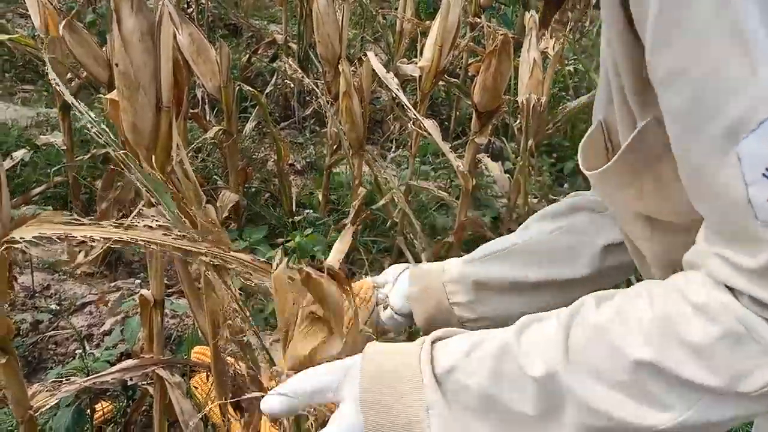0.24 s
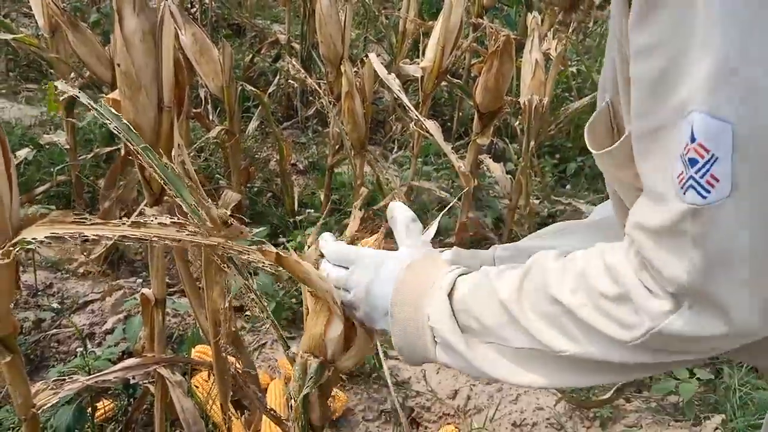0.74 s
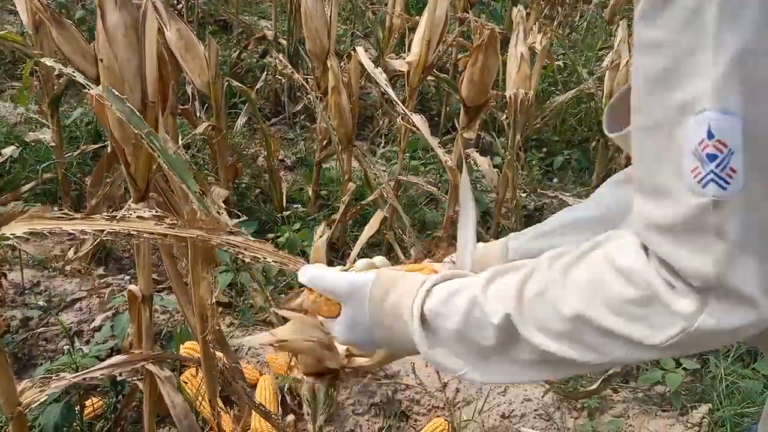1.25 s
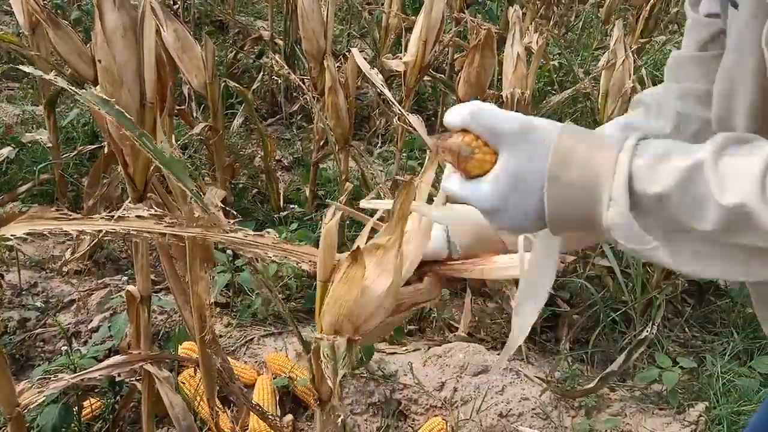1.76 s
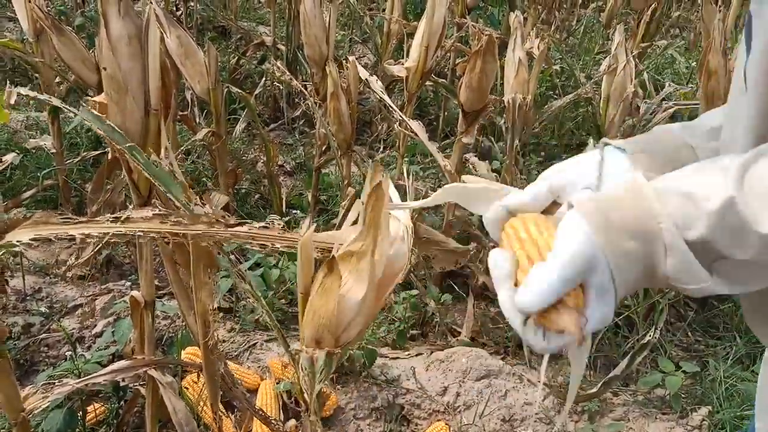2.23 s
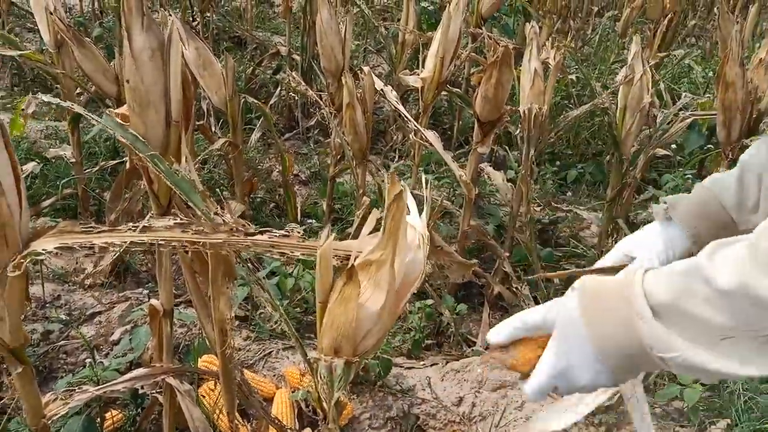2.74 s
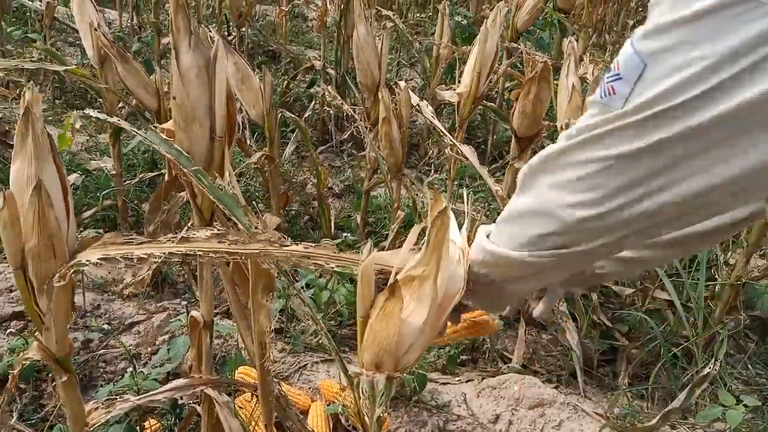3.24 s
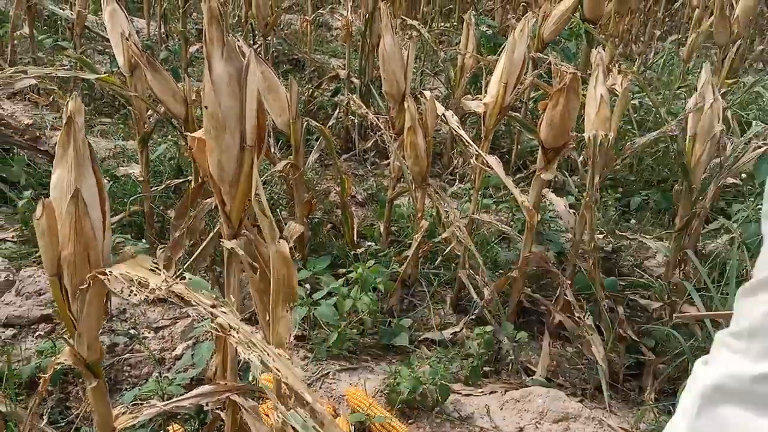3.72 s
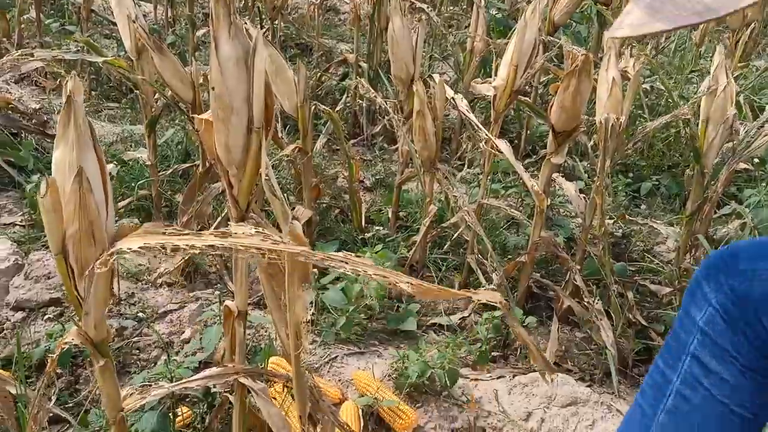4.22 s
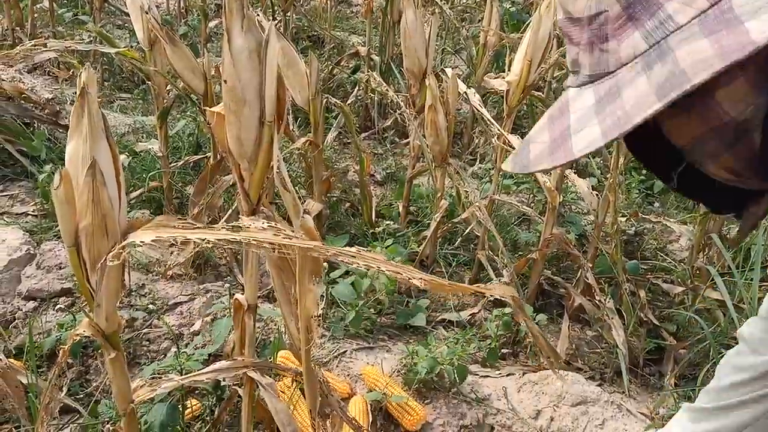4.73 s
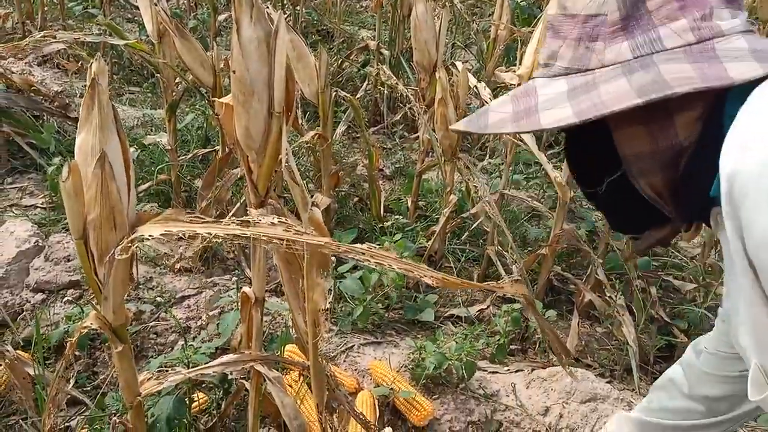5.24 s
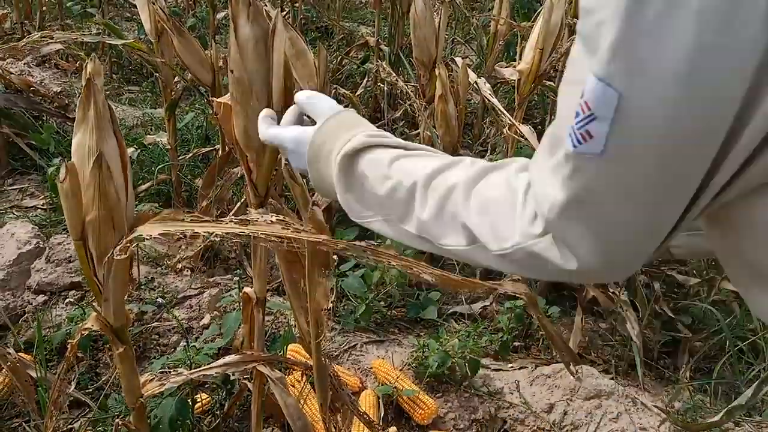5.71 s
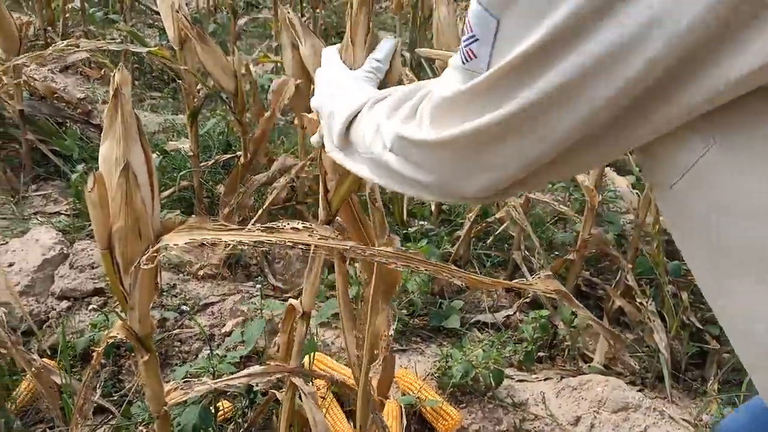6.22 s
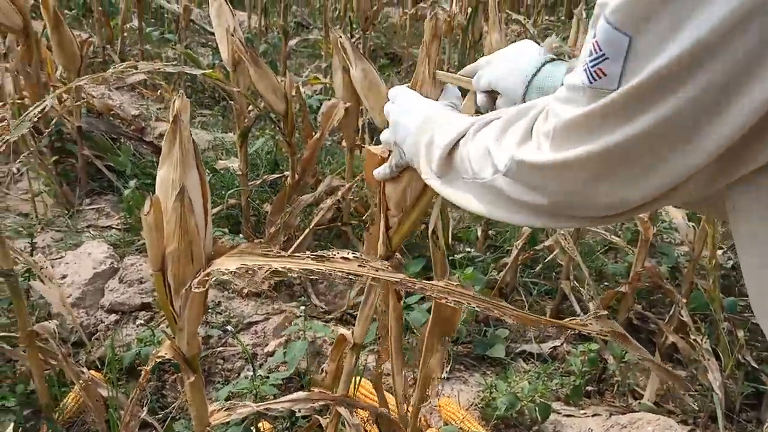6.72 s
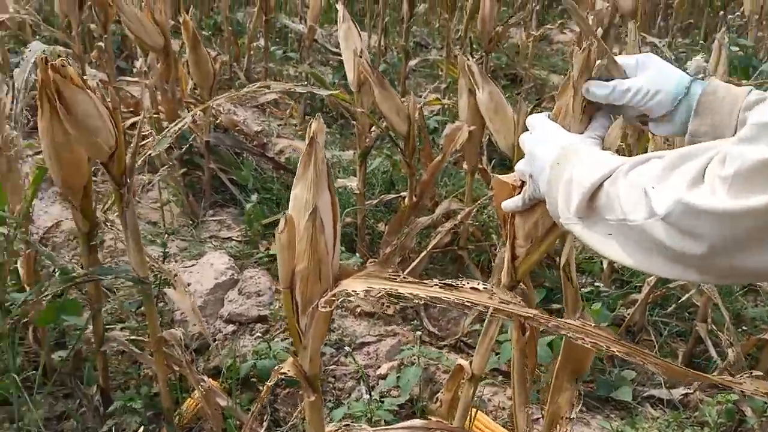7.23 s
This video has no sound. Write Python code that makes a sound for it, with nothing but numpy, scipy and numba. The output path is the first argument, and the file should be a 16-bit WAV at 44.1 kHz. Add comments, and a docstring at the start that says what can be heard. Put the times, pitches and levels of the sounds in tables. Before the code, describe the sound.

Hands grip and pull brittle corn leaves, giving crisp cracks, fibrous tearing and rustling strokes. Activity is dense at first, fades to a lull near three seconds, then comes back with a hard snap after four, looser rustles, and another crackling cluster toward the end. The place is outdoors and almost dry, recorded close in stereo, with a faint distant engine hum, quiet leaf hiss and two or three low air bumps on the right.

```python
"""Dry maize ribs snap over rubbing husks: an ear is husked by hand, an arm's length from the microphone.
Rubs and tears are swarms of tiny fibre breaks ringing leaves; ribs and folds break singly; the ear knocks dully.
Standing stalks add a short noise scatter. Puffs, bursts of slowing eddies, buffet the right port only.
Behind lie shaped field noise and a far engine, low sine harmonics that gain speed and then run on."""
import sys
import numpy as np
from scipy import signal
from scipy.fft import rfft, irfft
from scipy.io import wavfile
from scipy.ndimage import uniform_filter1d, map_coordinates
from numba import njit

SR = 44100
rng = np.random.default_rng(int(sys.argv[2]) if len(sys.argv) > 2 else 0)


def digitize_waveform(pressure):
    """Quantize a signal to 16-bit integers and store it at the path in sys.argv[1].

    Rows of a 2-D input are taken as channels; values are limited to [-1, 1].
    """
    field = np.atleast_2d(pressure).T
    bounded = np.clip(field, -1, 1)
    quanta = np.round(bounded * 32767).astype(np.int16)
    wavfile.write(sys.argv[1], SR, quanta)


N = 329148
T = np.arange(N) / SR

# background spectrum: f/Hz, relative level/dB
FIELD_SPECTRUM = [(25, -44), (65, 4.5), (110, 2.5), (220, -14.5), (350, -6), (520, -16), (770, -12.5),
                  (1200, -16), (2100, -7), (4200, -14), (6300, -13), (7600, -11), (9400, -60), (15000, -45)]
# far engine: t/s, base rate f/Hz, level before lumps and harmonic levels/dB
ENGINE_RUN = [(0, 36.6, -57), (.3, 40.1, -59.5), (.85, 41.85, -56), (1.3, 43.8, -60), (2, 44.75, -60.5),
              (2.7, 50.13, -61.5), (4.2, 49.87, -60), (5.5, 49.87, -61.5), (7, 50.8, -61.5),
              (7.46, 51.5, -63.5)]
# engine harmonics: multiple of base rate, relative level/dB
ENGINE_HARMONICS = [(2, 3), (3, -6.5), (4, -23), (5, -24), (6, -29), (7, -17)]
LABOUR_DB = 16  # lump spread, scaled by the shortfall from top speed
# air puffs on the right port: t/s, first eddy level/dB
AIR_PUFFS = [(1.159, -41.5), (4.886, -25.5), (5.161, -30)]
EDDY_HZ, EDDY_CYCLES, EDDY_GAP_S = 151, 0.55, 0.016  # rate of the first eddy, envelope width, spacing
EDDY_SLOWING, EDDY_FADE_DB = 0.77, 2.5  # rate ratio and level drop from eddy to eddy

# place of the hands: t/s, right-port lag/ms, left minus right level/dB
HAND_PATH = [(0, -0.048, -0.5), (1.2, -0.018, -1), (2.4, 0.052, -1), (3.6, 0.048, -0.6), (4.5, 0.21, 0),
             (5.6, 0.21, 0.5), (6.3, 0.28, 1), (6.8, 0.013, -2), (7.46, 0.16, -1.5)]
# dry husk spectrum: f/Hz, relative level/dB
HUSK_SPECTRUM = [(60, -40), (140, -16.5), (230, -9.5), (335, -9), (500, -12.5), (740, -1.5), (1120, 0),
                 (1450, 1.5), (2700, 3), (4300, -3), (6400, 1.5), (7700, -6.5), (9800, -18), (15500, -21)]
BODY_HZ, SIZZLE_HZ, TOP_HZ = 700, 3800, 15800  # body/crackle split, crackle/sizzle split, recorder cutoff
LEVEL_WINDOW_S = .005  # snap levels are the RMS of this first stretch

# ear knocking on stalk and glove: t/s, level/dB, ring f/Hz
EAR_KNOCKS = [(0.1044, -42, 830), (0.3227, -46, 606), (2.579, -60, 345), (4.3934, -43, 359.2),
              (5.701, -43.5, 726), (6.1463, -45.5, 300.7), (6.8028, -30, 640), (6.808, -39.5, 346)]
KNOCK_DECAY_S, KNOCK_WIDTH = 0.0049, 0.45  # 1/e decay; bandwidth / pitch
# clearest small folds giving way: t/s, crackle level/dB
CLEAR_CREASES = [(.0305, -37), (.0438, -40), (.1455, -42), (.1844, -48), (.3221, -41.5), (.4853, -41),
                 (.6312, -51), (.6877, -50), (.7352, -54), (.8115, -42.5), (.8765, -45), (.9042, -39),
                 (.9242, -46), (1.0168, -34.5), (1.0372, -31), (1.0932, -38), (1.1075, -42),
                 (1.5124, -41.5), (2.6059, -58), (2.774, -57), (2.984, -68), (3.005, -64), (3.0499, -64),
                 (3.0943, -59), (3.4325, -43.5), (3.4534, -38), (4.2227, -52), (4.3729, -40), (5.0573, -40),
                 (5.5392, -53), (5.5756, -43.5), (6.1274, -39), (6.1631, -38), (6.5165, -40),
                 (7.1785, -51.5)]
CREASE_HZ, CREASE_OCTAVES = 1950, .4  # median ring and its spread
CREASE_BODY_DB, CREASE_SIZZLE_DB, CREASE_SPLINTER_DB = -19, -7, -4  # sizzle holds at a level of -51.5 dB
CREASES_PER_S, CREASE_DB, CREASE_SPREAD_DB, CREASE_IDLE_DB = 30, -1.5, 3.2, -67  # CREASE_DB re rubbing crackle
# ribs, folds and shanks snapping: t/s, crackle level/dB, ring f/Hz, body re crackle level/dB,
# sizzle re crackle level/dB, splintering re first break level/dB
RIB_SNAPS = [(.0062, -24, 1520, -26, -35, -13), (.0158, -31, 1520, -22, -16, -12),
             (.052, -37, 1770, -21, -4, -6), (.0748, -31.5, 900, -13, -17, 8),
             (.1324, -40.5, 1100, -10, -6, 0), (.3003, -43, 1840, -19, -14, 3),
             (.416, -41, 1880, -41, 0.5, 9), (.4234, -46.5, 5820, -29, 4, 2), (.4548, -48, 2200, -27, 6, 7),
             (.4746, -39, 1610, -39.5, -22, -6), (.5839, -39, 1630, -8, 2.5, 7),
             (.6566, -29.5, 1320, -19, -10, -3), (.6588, -36, 1700, -12, -7, 4),
             (.8392, -37.5, 2130, -9, -10, 1), (1.0635, -31.5, 1290, -5, -16, 7),
             (1.0775, -27.5, 2530, -15, -5, 3), (1.1142, -38, 1997, -2, 3.5, 9),
             (1.196, -42.5, 2720, -26, 1, 2), (1.2377, -30.5, 1390, -24, -8, 15),
             (1.2483, -31.5, 1480, -25, -21, -3), (1.2651, -32, 1726, -20, -13, -12),
             (1.3228, -22, 2740, -28, -22, 6), (1.3298, -22, 2350, -13, -15, 3),
             (1.3374, -28, 2850, -4.5, -10, 4), (1.4663, -44, 2720, -26, 4, 2),
             (1.5745, -35, 2773, -29, -18, 6), (1.5892, -26.5, 2100, -18, -9, 2),
             (1.5937, -25.5, 2980, -9.5, -15, 7), (1.5996, -21.5, 2240, -11, -12, 13),
             (1.6156, -42, 2820, -28, 17.5, 14), (1.6253, -37.5, 3450, 1, 12, 1),
             (1.6808, -30.5, 2020, -24, 2.5, 5), (1.7113, -42, 2130, -24, -14, -3),
             (1.8614, -28, 1990, -19, -32, -1), (1.882, -27.5, 2000, -30, -16, -4),
             (1.896, -25, 2080, -7.5, -35, 13), (2.4107, -44.5, 2280, -39, -16, -4),
             (2.4251, -49.5, 6000, -30, 5.5, 11), (2.4402, -41.5, 3470, -36, 0, 1),
             (2.4649, -44.5, 2110, -16, 0, 13), (2.547, -52, 2000, -4, -1, 10),
             (2.8387, -55, 2220, -7, 3, 1), (2.9305, -44, 2100, -21, -16, 2),
             (3.3463, -45.5, 1978, -7, -9, -8), (3.4981, -33, 1034, -10, -13, 1),
             (3.5405, -24.5, 2450, -16, -7, 7), (3.5477, -23.5, 1310, -7.5, -22, 7),
             (3.6294, -41, 3010, -19, 9.5, 12), (3.6483, -35, 3026, -22, -4, 1),
             (3.8296, -44.5, 1300, -10, 9, 19), (3.8596, -38.5, 1170, -6, 1, 11),
             (4.2591, -36, 1240, -14, -1.5, 26), (4.2726, -40, 1810, -10, 3, 9),
             (4.3922, -18, 3154, -6, -4.5, 13.5), (4.3968, -34, 2660, 3, 2, 0),
             (4.5157, -34.5, 1160, -2, -4, 4), (4.5287, -31, 2270, -2.5, -7, 20),
             (4.5581, -26.5, 2670, -20, -14, 4), (4.5752, -30.5, 2900, -6, -3, 8),
             (4.6161, -38, 2540, -17, 13.5, -3), (4.7162, -34, 4300, -37, -5, 19),
             (4.8419, -37, 2500, -39, -15, 17), (5.6003, -42.5, 2710, -16, -10, 10),
             (5.9635, -37, 2520, -8.5, -6, 19), (6.1448, -34.5, 2170, -7, 0.5, 15),
             (6.2105, -38.5, 2510, -12, -4, 19), (6.2895, -38.5, 2410, -12, -9, 7),
             (6.4254, -19, 1790, -19, -27, -6.5), (6.4914, -33.5, 1727, -10, -15, 12),
             (6.5378, -35.5, 2530, -19, -11, 7), (6.598, -41.5, 2740, -10, -2.5, 18),
             (6.7407, -35.5, 2000, -24, 4, -1), (6.744, -28, 2230, -18, -4, -3),
             (6.7648, -28.5, 2230, -13, -5, 0), (6.776, -33, 2930, -8, -12, -2),
             (6.78, -27, 3080, -12, -7, -2), (6.8025, -24.5, 2820, -10, -5, 5),
             (6.8102, -25.5, 2360, -17, -2, 0), (6.8432, -33, 2420, -8, -4, 12),
             (6.8713, -29, 6150, -13, -6, 5), (6.8788, -30.5, 2280, -9, -11, -3),
             (6.939, -34, 2420, -6.5, -9.5, 3.5), (7.214, -46, 2400, -6, -2, 9),
             (7.333, -39.5, 1500, -20, -15, 9), (7.3953, -28, 2340, -18, -24, -20),
             (7.4358, -27.5, 1790, -11, -15.5, -2)]

# hands sliding over husks and brushing leaves: t of the top/s, crackle level/dB, rise/s, fall/s,
# body re crackle level/dB, sizzle re crackle level/dB, sheet f/Hz, hollow re crackle level/dB
HAND_STROKES = [(0.013, -35, .18, 0.062, -14, -6.5, 1520, -3), (.17, -44, 0.19, 0.28, -31, -7, 1230, -8),
                (.327, -43.5, 0.069, 0.028, -20, -.5, 1850, -2),
                (.51, -47.5, .055, 0.093, -30, -2, 1590, -4), (0.759, -46.5, .018, .05, -20, -2, 2200, -16),
                (.83, -45, 0.044, 0.084, -8, -1, 2200, -4), (0.911, -42.5, .043, 0.043, -5, -1, 2190, -23),
                (1.13, -42.5, 0.055, 0.07, -8.5, -7, 2110, -6),
                (1.371, -41.5, 0.017, 0.052, -13.5, -4, 2200, -22),
                (1.52, -48, 0.11, .08, -35, -7, 2100, -23),
                (1.651, -39.5, 0.025, 0.051, -10.5, -13, 2070, -9),
                (1.799, -43, .071, 0.077, -29, -4, 1850, -12),
                (2.001, -44, 0.15, 0.058, -20, -2.5, 2100, -3),
                (2.07, -45, 0.078, 0.059, -18, -1.5, 2400, -18),
                (2.197, -46, 0.028, 0.053, -30, -1.5, 2450, -12),
                (2.296, -48, .028, 0.091, -15, 1, 2700, -25),
                (2.487, -48, 0.047, 0.029, -16, 1.5, 2307, -5), (2.85, -59, .013, 0.069, -11, 0, 2200, -16),
                (2.927, -52, 0.027, .016, -21, -10, 1850, -13),
                (2.995, -64.5, .024, 0.016, 0, 13, 2600, -11),
                (3.145, -66.5, 0.033, 0.023, 2, 10, 2600, -8),
                (3.36, -50, 0.046, 0.042, -10, -4.5, 1990, -8),
                (3.485, -43, 0.08, 0.13, -18, -4, 2430, -1.5),
                (3.65, -37.5, 0.063, 0.19, -17.5, -3.5, 2540, -1), (3.78, -40, 0.13, 0.069, -9, 5, 1840, 2),
                (3.964, -43.5, 0.11, 0.12, -15, -2, 2630, -5), (4.355, -50, 0.069, 0.073, -14, -2, 1600, 0),
                (4.71, -43, 0.14, 0.1, -12.5, -5, 2450, -8), (4.87, -48, .018, 0.063, -8, -7, 2380, -18),
                (5.04, -38, 0.07, 0.037, -11.5, -9.5, 1680, -1.5),
                (5.19, -48.5, 0.17, 0.15, -10.5, -5, 1780, -15),
                (5.61, -48, 0.037, .03, -13, -10, 1860, -21),
                (5.695, -39.5, 0.033, .049, -12, -9, 2034, -30),
                (5.785, -41.5, 0.068, 0.097, -10, -4.5, 2250, -12),
                (5.956, -46.5, 0.11, 0.1, -9.5, -2, 2530, -23),
                (6.07, -45.5, 0.058, .062, -20, -13, 1650, -10),
                (6.241, -44, 0.18, 0.12, -8, -4, 2600, -7.5),
                (6.485, -42, 0.15, 0.076, -7.5, -4, 2110, -1.5), (6.61, -52, 0.12, .11, -12, -2, 2730, -2),
                (6.711, -44.5, 0.067, .04, -20, -2.5, 2400, -2),
                (6.921, -45, 0.027, .023, -9, -10, 2422, 2),
                (6.97, -56.5, .063, 0.16, -11, -2.5, 2340, -14),
                (7.27, -49, 0.061, 0.079, -31, -3, 2050, -21),
                (7.369, -42, 0.081, 0.37, -26, -6.5, 1600, -4)]
STROKE_CURVE, STROKE_DROP_DB = 1.13, 10.5  # exponent; drop one rise or fall time from the top
# husk ripped down the ear: start t/s, length/s, final crackle level/dB,
# body re crackle level/dB, sizzle re crackle level/dB, sheet f/Hz, hollow re crackle level/dB
HUSK_TEARS = [(1.02, 0.067, -33, -14.5, -4.5, 1260, -2.5), (1.24, 0.091, -32, -14, -8, 1520, -10.5),
              (1.585, 0.036, -30, -22, -5.5, 2300, -13), (1.858, 0.047, -35.5, -20, -10, 1940, -6.5),
              (3.541, 0.018, -35.5, -5, -2, 1820, -8), (4.412, 0.052, -32, -13, -5.5, 2540, -13),
              (4.513, 0.009, -27.5, -7.5, -4, 2700, -9), (4.547, 0.083, -30.5, -9, -5, 2820, -2.5),
              (6.73, 0.079, -36, -25, -8, 2650, -4), (6.828, 0.025, -34.5, -33, -2, 2580, -20),
              (6.86, 0.024, -33, -28, -6, 2680, -7)]
TEAR_GRIP_S, TEAR_BUILD_DB, TEAR_RELEASE_S = 0.033, 7, 0.017  # onset, build during the pull, release
REST_DB, REST_BODY_DB, REST_SIZZLE_DB = -78, -21, 9.5  # leaves settling between strokes
REST_SHEET_HZ, REST_HOLLOW_DB = 1600, -23
SHEET_DB, SHEET_WIDTH = -9, .8  # sheet ring re crackle; bandwidth / centre
HOLLOW_HZ, HOLLOW_WIDTH, HOLLOW_LOWEST_HZ = 810, .9, 540  # bandwidth / centre; high-pass corner
RING_WANDER = .14  # spread of the log of the ring centres
CONTACT_DB = 2.8  # spread of each leaf's share in the rustle


def undb(db):
    """Decibels to gain."""
    return 10 ** (np.asarray(db) / 20)


def rms(x):
    """Root mean square."""
    return np.sqrt(np.mean(x ** 2)) + 1e-12


def curves(table):
    """Table columns, joined by straight lines in time."""
    s, *columns = np.transpose(table)
    return [np.interp(T, s, column) for column in columns]


def walk(rate_hz):
    """Slow random curve of unit RMS: held draws, smoothed twice."""
    hold = int(SR / rate_hz)
    steps = np.repeat(rng.standard_normal(N // hold + 1), hold)
    smooth = uniform_filter1d(uniform_filter1d(steps, hold), hold)[:N]
    return smooth / rms(smooth)


def steep(x, hz, kind):
    """Second-order low- or high-pass, applied twice."""
    sos = signal.butter(2, hz, kind, fs=SR, output="sos")
    return signal.sosfilt(np.vstack([sos, sos]), x)


def colour(x, points, size=2048):
    """Minimum-phase filter through (f/Hz, level/dB) points, from the folded cepstrum."""
    hz, db = np.transpose(points)
    grid_hz = np.linspace(1, SR / 2, size // 2 + 1)
    grid_db = np.interp(np.log(grid_hz), np.log(hz), db)
    cepstrum = irfft(np.log(undb(grid_db)))
    cepstrum[1:size // 2] *= 2
    cepstrum[size // 2 + 1:] = 0
    impulse = irfft(np.exp(rfft(cepstrum)))
    return signal.fftconvolve(x, impulse[None], axes=1)[:, :x.shape[1]]


def ports(size, apart_hz):
    """Noise for two ports: alike in the bass, less alike in the treble."""
    mid, side = rng.standard_normal((2, size))
    side = signal.sosfilt(signal.butter(1, apart_hz, "high", fs=SR, output="sos"), side)
    return np.array([mid + side, mid - side])


@njit
def resonate(x, hz, width):
    """Band-pass with a movable centre; width = bandwidth / centre."""
    y = np.empty(x.shape)
    for c in range(len(x)):
        band, low = 0., 0.
        for i in range(x.shape[1]):
            g = np.tan(np.pi * hz[i] / SR)
            v = (band + g * (x[c, i] - low)) / (1 + g * (g + width))
            band, low, y[c, i] = 2 * v - band, low + 2 * g * v, width * v
    return y


def background():
    """Low rumble and the faint hiss of dry leaves across the field: shaped noise, slowly swelling."""
    air = colour(ports(N, apart_hz=880), FIELD_SPECTRUM)
    breeze = undb(.8 * walk(5))
    return air / rms(air) * breeze * undb(-60.0)


def engine():
    """Only low exhaust harmonics carry this far; the hum is lumpy until the engine is up to speed."""
    hz, level_db = curves(ENGINE_RUN)
    phase = 2 * np.pi * np.cumsum(hz * (1 + 0.0124 * walk(7.1))) / SR
    hum = 0
    for multiple, db in ENGINE_HARMONICS:
        flutter = 1 + .14 * walk(8)
        hum = hum + undb(db) * flutter * np.sin(multiple * phase + rng.uniform(0, 2 * np.pi))
    lumps_db = LABOUR_DB * (1 - hz / hz.max()) * (walk(20) - .5)
    port_db = np.array([[-1.5], [.3]])
    return hum * undb(level_db + lumps_db + port_db)


def buffeting(count=3):
    """Moving air meets only the right port: faint flutter, and puffs whose eddies slow and weaken."""
    puffs = np.zeros(N)
    for s, db in AIR_PUFFS:
        for k, (late, phase) in enumerate(rng.uniform(-1.3, 1, (count, 2))):
            since_s = T - s - EDDY_GAP_S * (k + 0.082 * late)
            cycles = since_s * EDDY_HZ * EDDY_SLOWING ** k
            near = abs(cycles) < 4
            envelope = np.exp(-(cycles[near] / EDDY_CYCLES) ** 2)
            puffs[near] += undb(db - EDDY_FADE_DB * k) * np.sin(2 * np.pi * cycles[near] + phase) * envelope
    flutter = steep(steep(rng.standard_normal(N), 184, "low"), 22, "high")
    gusts = undb(2.5 * walk(9))
    return np.outer([0, 1], puffs + flutter / rms(flutter) * gusts * undb(-71.0))


def in_field(x, scatter_db, scatter_s):
    """Hands move before the two ports; the stalks around throw back a short, faint scatter."""
    lag_ms, pan_db = curves(HAND_PATH)
    right = map_coordinates(x[1], [np.arange(N) - lag_ms * SR / 10 ** 3], order=3)
    direct = np.array([x[0], right]) * undb(np.array([pan_db, -pan_db]) / 2)
    t = T[:SR // 3]
    scatter = ports(len(t), apart_hz=1380) * np.exp(-t / scatter_s) * np.minimum(t / .005, 1)
    scatter /= np.sqrt(np.sum(scatter ** 2) / 2)  # unit energy per port
    return direct + undb(scatter_db) * signal.oaconvolve(direct, scatter, axes=1)[:, :N]


def knocking(size=3000):
    """A soft blow rings the ear for a few cycles."""
    out = np.zeros((2, N + size))
    t = np.arange(size) / SR
    for s, db, hz in EAR_KNOCKS:
        ring = np.sin(2 * np.pi * hz * t) * np.exp(-t / KNOCK_DECAY_S)
        ring = resonate(ring[None], np.full(size, float(hz)), float(KNOCK_WIDTH))
        start = int(s * SR)
        out[:, start:start + size] += undb(db) * ring / rms(ring[:, :2 * int(LEVEL_WINDOW_S * SR)])
    return out[:, :N]


def registers(x):
    """Body, crackle and sizzle of a husk sound; thin sheets radiate no deep bass."""
    x = steep(colour(x, HUSK_SPECTRUM), 115, "high")
    upper = steep(x, BODY_HZ, "high")
    return steep(x, BODY_HZ, "low"), steep(upper, SIZZLE_HZ, "low"), steep(upper, SIZZLE_HZ, "high")


def leaf(hz, sharpness, ring_db, splinter_db, splinter_s, size=1500):
    """One break in a dry leaf: a tick, then dying splinters, both ringing the sheet."""
    t = np.arange(size) / SR
    tick = np.eye(1, size)[0]
    splinters = ports(size, apart_hz=2130) * np.exp(-t / splinter_s) * (1 - np.exp(-t / .0006))
    drive = tick / rms(tick) + undb(splinter_db) * splinters / rms(splinters)
    resonance = signal.iirpeak(min(hz, SR / 4), max(sharpness, 1), fs=SR)
    return drive + undb(ring_db) * signal.lfilter(*resonance, drive)


def creases(crackle_gain):
    """Small folds give way, the quieter the brighter: clear ones plus random ones; columns as RIB_SNAPS."""
    slots = int(N / SR * CREASES_PER_S)
    late, size = rng.standard_normal((slots, 2)).T
    at = np.clip((np.arange(slots) + .5 + .5 * late) * N / slots, 0, N - 1).astype(int)
    rubbing_db = 20 * np.log10(crackle_gain[at])
    level_db = np.maximum(rubbing_db + CREASE_DB, CREASE_IDLE_DB) + CREASE_SPREAD_DB * size
    folds = CLEAR_CREASES + list(zip(at / SR, level_db))
    rows = []
    for (s, db), (pitch, edge) in zip(folds, rng.standard_normal((len(folds), 2))):
        hz = CREASE_HZ * 2 ** (CREASE_OCTAVES * pitch)
        sizzle_db = CREASE_SIZZLE_DB - 0.44 * (db + 51.5) + CREASE_SPREAD_DB * edge
        rows.append((s, db, hz, CREASE_BODY_DB, sizzle_db, CREASE_SPLINTER_DB))
    return rows


def snapping(snaps):
    """A sharp break rings its leaf; thick ribs have more body, fibrous ones splinter on."""
    out = np.zeros((2, N + SR))
    for s, db, hz, body_db, sizzle_db, splinter_db in snaps:
        woody_db = 13.0 - 0.34 * sizzle_db  # dull, woody parts ring more than papery ones
        sharpness = 2.0 - 0.032 * sizzle_db
        snapped = leaf(hz, sharpness, ring_db=woody_db, splinter_db=splinter_db, splinter_s=0.0043)
        crack = 0
        for relative_db, x in zip((body_db, 0, sizzle_db), registers(snapped)):
            crack = crack + undb(db + relative_db) * x / rms(x[:, :int(LEVEL_WINDOW_S * SR)])
        start = int(s * SR)
        out[:, start:start + crack.shape[1]] += crack
    return out[:, :N]


def gestures():
    """Gain curve and colour of each movement: strokes swell and fade, tears build and let go."""
    moves = [(undb(REST_DB) * np.ones(N), REST_BODY_DB, REST_SIZZLE_DB, REST_SHEET_HZ, REST_HOLLOW_DB)]
    for s, db, rise_s, fall_s, *tone in HAND_STROKES:
        away = np.minimum(np.maximum((s - T) / rise_s, (T - s) / fall_s), 10)
        moves.append((undb(db - STROKE_DROP_DB * away ** STROKE_CURVE), *tone))
    for s, length_s, db, *tone in HUSK_TEARS:
        before = np.maximum(s - T, 0) / TEAR_GRIP_S
        after = np.maximum(T - s - length_s, 0) / TEAR_RELEASE_S
        build_db = np.interp(T, [s, s + length_s], [-TEAR_BUILD_DB, 0])
        moves.append((undb(db + build_db) * np.exp(-np.minimum(before + after, 20)), *tone))
    return moves


def effort():
    """Register gains and sheet pitch: movements add their power, which also weights the pitch."""
    gains, body_db, sizzle_db, sheet_hz, hollow_db = zip(*gestures())
    power = np.square(gains)
    shares = undb([body_db, np.zeros(len(gains)), sizzle_db, hollow_db])
    register_gains = np.sqrt(shares ** 2 @ power)  # body, crackle, sizzle, hollow
    return register_gains, np.array(sheet_hz) @ power / power.sum(axis=0)


def swarm(rate_hz, spread_db):
    """Fibre breaks of very unequal size, levelled so that their local power stays near constant."""
    struck = rng.random(N) < rate_hz / SR
    size = undb(spread_db * np.minimum(rng.exponential(size=N), 4.2))
    breaks = struck * rng.choice([-1, 1], N) * size
    local_power = np.maximum(uniform_filter1d(breaks ** 2, int(0.054 * SR)), 0)
    return breaks / np.sqrt(local_power + rate_hz / SR)


def ringing(x, hz, width):
    """A steep resonance that wanders as the husk bends."""
    hz = hz * np.exp(RING_WANDER * walk(25))
    y = resonate(resonate(x, hz, float(width)), hz, float(width))
    return y / rms(y)


def rubbing(gains, sheet_hz, count=18):
    """Fibres catch and break on many leaves, faster under a harder pull; sheet and hollow husk ring."""
    pull = (gains[1] / undb(-43.5)) ** .25
    breaks = swarm(4500 * pull, spread_db=4.0)
    owner = rng.integers(0, count, N)
    rustle = 0
    for k, hz in enumerate(np.geomspace(300, 6300, count)):
        response = leaf(hz, sharpness=4.5, ring_db=13, splinter_db=2, splinter_s=.002)
        contact = undb(CONTACT_DB * walk(35))  # each leaf comes into play and slips away
        own_breaks = breaks * contact * (owner == k)
        rustle = rustle + signal.oaconvolve(own_breaks[None], response, axes=1)[:, :N]
    # brittle edges chip with ticks that hardly ring
    chip = leaf(1700, sharpness=1.5, ring_db=1, splinter_db=-7, splinter_s=.0012)
    ticks = signal.oaconvolve(swarm(700 * pull, spread_db=3.5)[None], chip, axes=1)[:, :N]
    fibres = rustle / rms(rustle) + undb(-2.5) * ticks / rms(ticks)
    body, crackle, sizzle = registers(fibres)
    crackle = crackle / rms(crackle) + undb(SHEET_DB) * ringing(crackle, sheet_hz, SHEET_WIDTH)
    hollow = steep(ringing(fibres, HOLLOW_HZ, HOLLOW_WIDTH), HOLLOW_LOWEST_HZ, "high")
    return sum(gain * x / rms(x) for gain, x in zip(gains, (body, crackle, sizzle, hollow)))


def scene():
    """Husking close by, over the open field."""
    outdoors = background() + engine() + buffeting()
    gains, sheet_hz = effort()
    cracks = knocking() + snapping(creases(gains[1])) + snapping(RIB_SNAPS)
    near_cracks = in_field(cracks, scatter_db=-12.5, scatter_s=0.045)
    near_rubbing = in_field(rubbing(gains, sheet_hz), scatter_db=-8.0, scatter_s=0.026)
    return outdoors + near_cracks + near_rubbing


def record(dry):
    """The recorder cuts the top with a steep elliptic low-pass."""
    return signal.sosfilt(signal.ellip(10, .2, 70, TOP_HZ, fs=SR, output="sos"), dry)


dry = scene()
out = record(dry)
digitize_waveform(out)
```